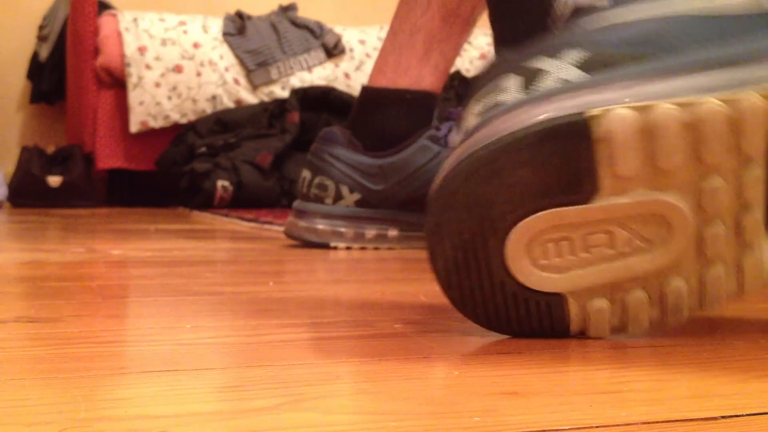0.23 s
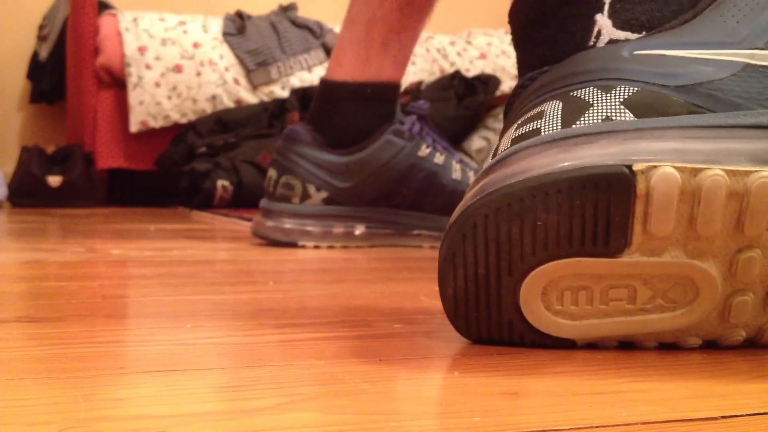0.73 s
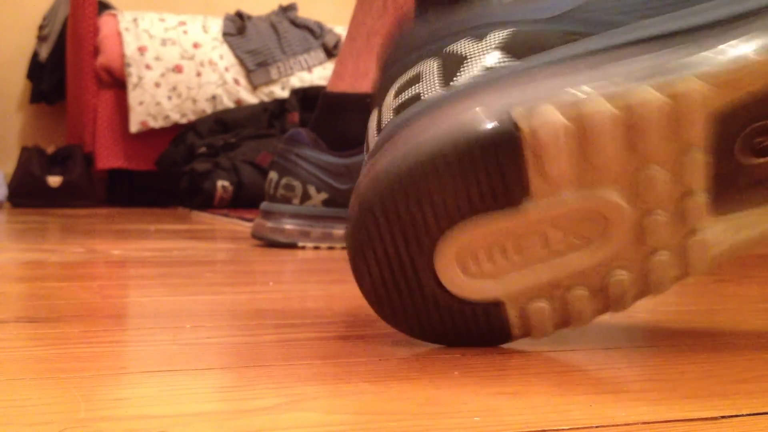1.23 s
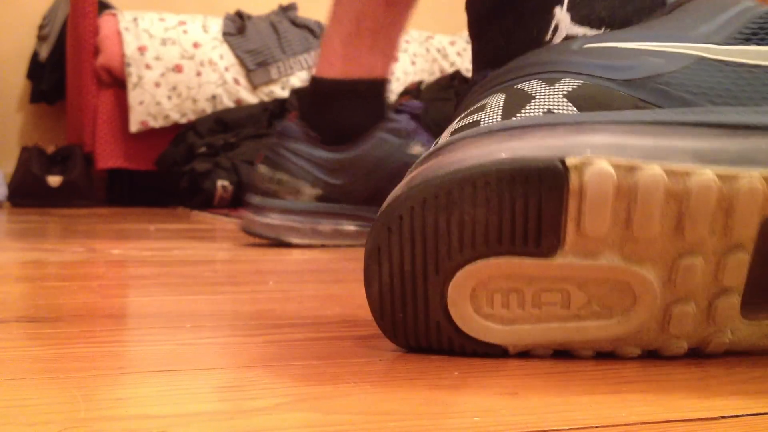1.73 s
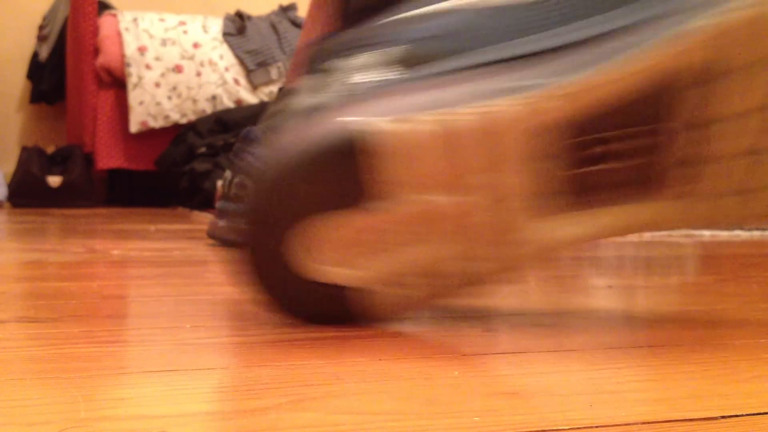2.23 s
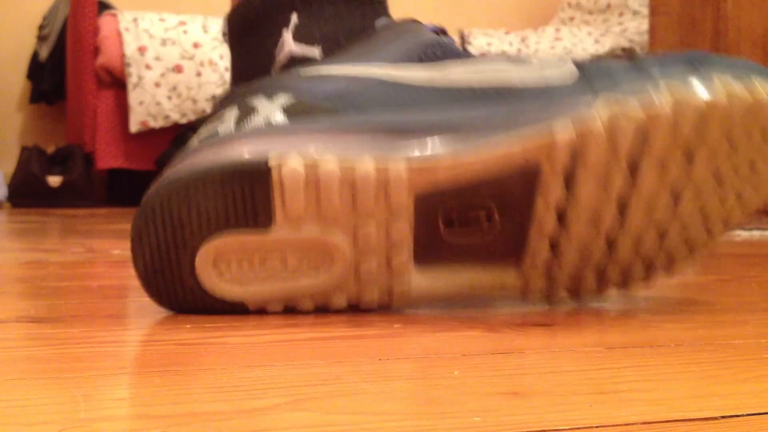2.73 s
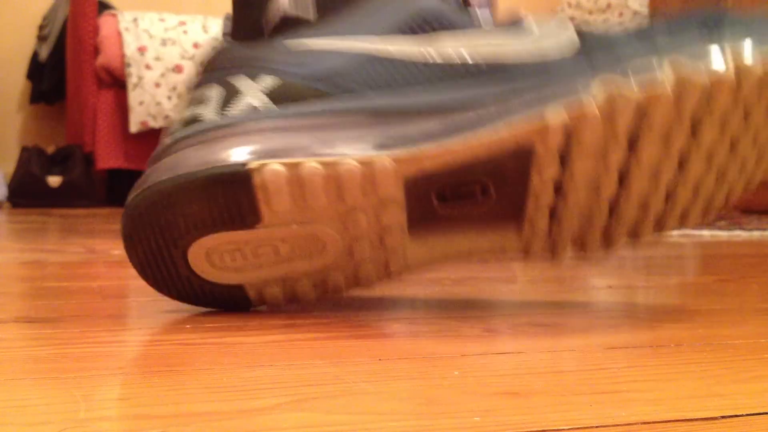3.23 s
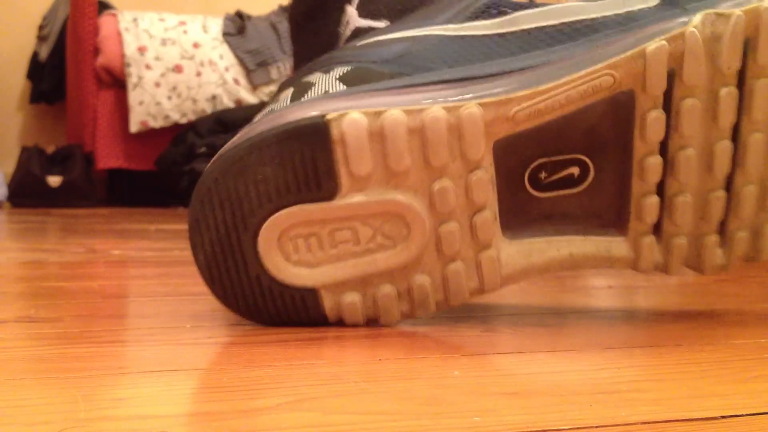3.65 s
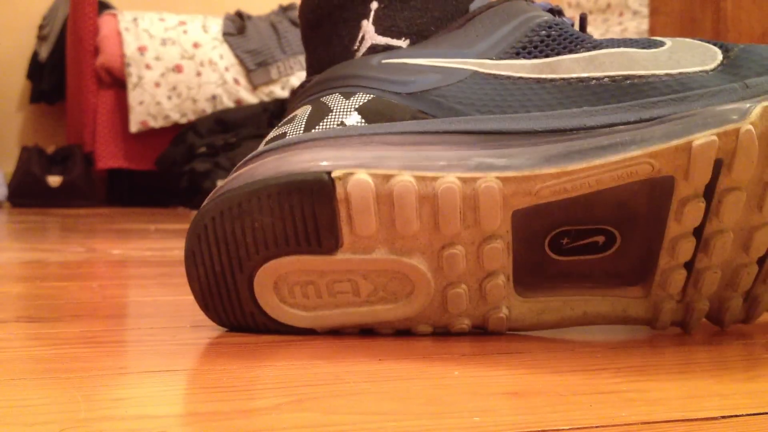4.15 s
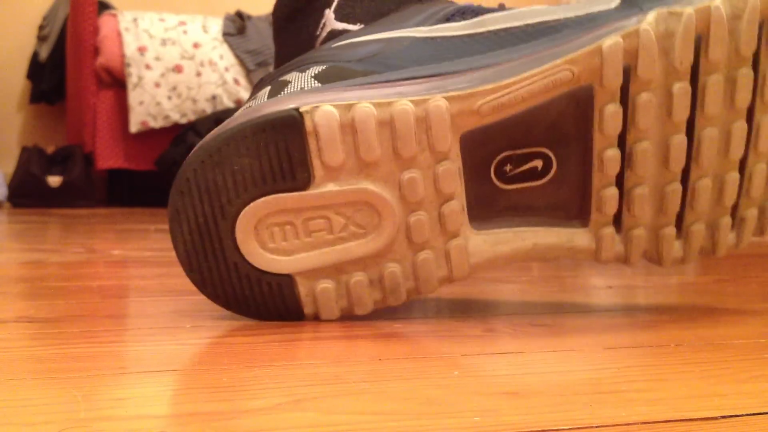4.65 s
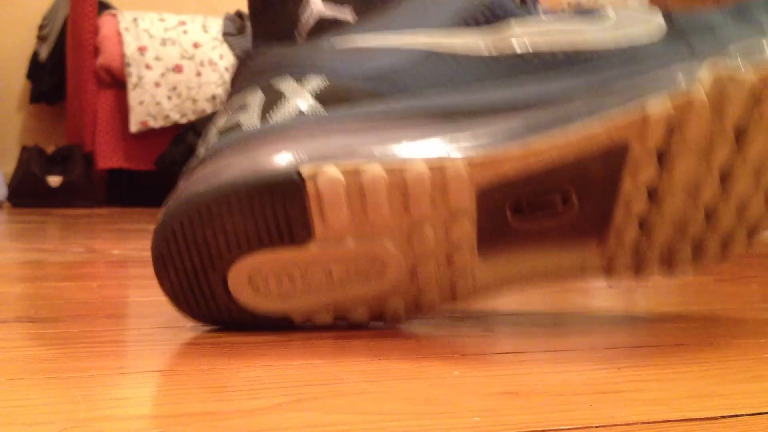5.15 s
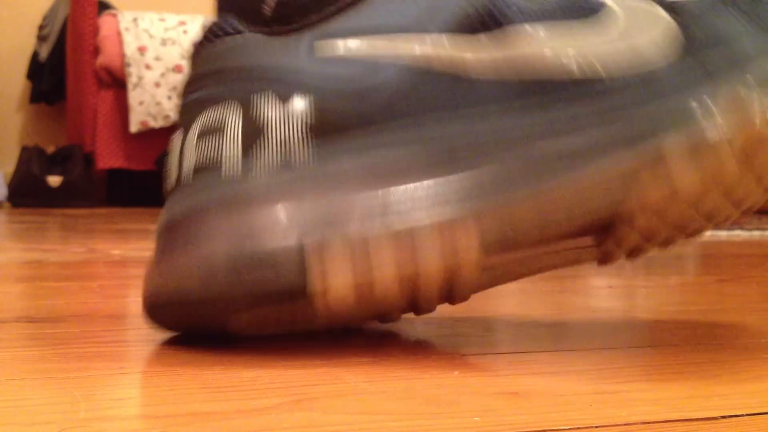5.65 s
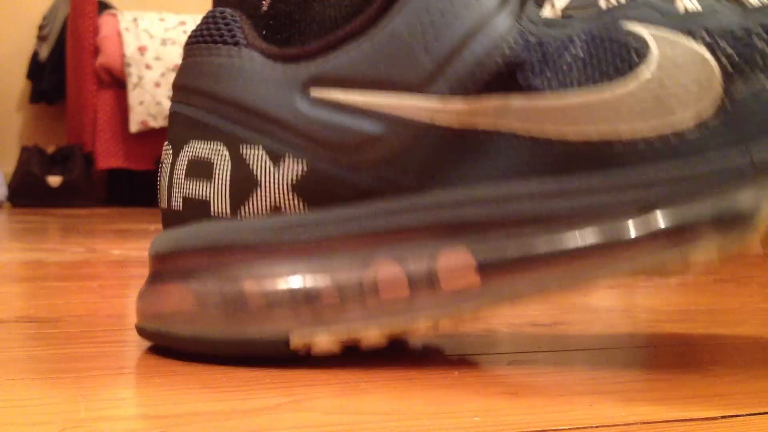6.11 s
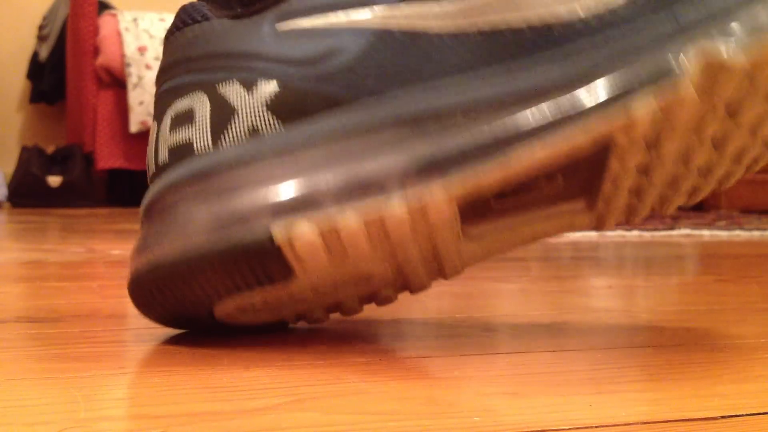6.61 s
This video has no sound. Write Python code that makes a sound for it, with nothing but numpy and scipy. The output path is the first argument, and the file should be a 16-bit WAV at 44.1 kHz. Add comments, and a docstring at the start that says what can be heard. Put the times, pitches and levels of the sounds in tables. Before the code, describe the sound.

A rubber-soled sneaker rolls and scuffs on a hardwood floor, with soft heel thuds, small ticks and sharp snaps.

```python
"""A heel thuds softly on hardwood: a rubber-soled sneaker is stepping and rolling, close by in a small room.
Lugs tick as they peel off the varnish and the hollow cushion knocks. About once a second the tread
grips, sometimes creaks, and lets go with a sharp snap that rings the air in its grooves. Late on, the
sole slaps down once, then drags. Underneath, the shoe brushes over specks of grit and its cushion
flexes with the shifting weight."""
import sys
import numpy as np
from scipy import signal
from scipy.fft import rfft, irfft, next_fast_len
from scipy.io import wavfile

SR = 44100
rng = np.random.default_rng(int(sys.argv[2]) if len(sys.argv) > 2 else 0)


def generate_wav(sig):
    """Save sig (samples, or channels by samples) to the path in sys.argv[1] as 16-bit PCM at SR."""
    pcm = np.round(np.clip(np.atleast_2d(sig).T, -1, 1) * 32767).astype(np.int16)
    wavfile.write(sys.argv[1], SR, pcm)


N = 303048

# EQ curve of each layer: frequency_hz, gain_db
HISS_EQ = [(30, -20), (70, -10), (115, -2), (145, -13), (200, -3.5), (370, -7), (800, -15), (6500, -21.5),
           (15500, -23.5)]
BRUSH_EQ = [(290, -61.5), (500, -6), (680, -2), (1000, -1.5), (2500, -8), (15500, -27.5)]
FLEX_EQ = [(40, -37), (100, -10.5), (210, 3), (400, -3.5), (700, -12.5), (4000, -61)]
SCUFF_EQ = [(75, -40.5), (240, -1.5), (1200, 1), (2800, -3), (4500, -8.5), (7000, -9.5), (10000, -13.5),
            (15000, -23)]
KNOCK_EQ = [(25, -45), (100, 0), (170, -2), (260, -8.5), (500, -22.5), (900, -23), (15000, -72)]
THUD_EQ = [(35, -52), (80, -9), (170, -0.5), (240, -3), (320, -11), (420, -18.5), (700, -22), (1400, -30),
           (1850, -27), (2250, -39), (15000, -73.5)]
TICK_EQ = [(80, -24.5), (350, -9.5), (1600, -8.5), (2500, -3), (3600, -5.5), (4700, -6), (5000, -17.5),
           (6000, -18), (8000, -25), (15000, -43)]
CREAK_EQ = [(120, -35), (450, -29.5), (900, -7.5), (1270, -22.5), (1550, -10.5), (2080, -14.5), (2500, 2.5),
            (2850, -4.5), (3150, 2.5), (3700, -13), (4200, -8), (4900, -22.5), (7000, -20.5),
            (15000, -35.5)]
SLAP_EQ = [(50, -62), (150, -15), (350, -6), (1050, -3.5), (2000, -3), (4500, -17), (6300, -15.5),
           (8000, -29), (15000, -51)]
SNAP_EQ = [(60, -44.5), (200, -23.5), (500, -18.5), (1000, -8), (2400, -4.5), (3200, 4.5), (3500, -5.5),
           (4100, -18), (5000, -29.5), (7000, -31), (10000, -41), (15000, -52)]
FIZZ_EQ = [(3700, -23), (4700, 2.5), (7000, -0.5), (10000, -12.5), (16000, -17.5)]

# reverb send of each layer, relative to its direct sound: frequency_hz, gain_db
KNOCK_SEND = [(130, -5), (250, 0.5)]
THUD_SEND = [(70, -8), (140, -18.5), (200, -0.5), (8000, 1.5)]
TICK_SEND = [(150, 7), (1000, 1.5), (3000, -9.5), (5000, -11), (12000, -4.5)]
CREAK_SEND = [(130, -17.5), (200, 16), (350, -1.5), (900, -7.5), (1600, -1), (2600, -12.5), (3200, -12),
              (5000, -4), (12000, 1.5)]
SLAP_SEND = [(450, 3), (1200, 9), (3000, -0.5), (6000, -9), (12000, 0)]
SNAP_SEND = [(60, -10.5), (140, -5.5), (190, 7.5), (520, 4), (1000, -1.5), (2000, -2.5), (2750, -8.5),
             (3250, -13.5), (3500, -13.5), (4200, -10.5), (5000, -10), (12000, -3)]
# decay of the room: frequency_hz, t60_s
ROOM_DECAY = [(100, 0.43), (1000, 0.43), (3000, 0.43), (8000, .44), (14000, 0.16)]
# early reflections: delay_s, gain
NEAR_ECHOES = [(.0031, 0.13), (.0049, .2)]  # off the shoe and furniture
CEILING_ECHOES = [(0.0167, 0.29)]
# ring of the floorboards: pitch_hz, level_db, t60_s
BOARD_MODES = [(77.5, -47, 0.58), (103, -47.5, 1), (202.4, -40, 0.78), (325.8, -36, 0.27)]

# fader rides for the shoe brushing the floor and the cushion flexing: time_s, level_db
BRUSH_RIDE = [(0, -61), (0.12, -72.5), (0.38, -61), (0.6, -74), (0.86, -59.5), (1.42, -76), (1.52, -67.5),
              (1.9, -71.5), (2.55, -92), (2.73, -67.5), (3.75, -74.5), (3.89, -58.5), (4.0, -72),
              (4.24, -63), (4.72, -73), (5.07, -86), (5.6, -65.5), (5.98, -69), (6.38, -62.5),
              (6.58, -77.5), (6.87, -56.5)]
FLEX_RIDE = [(0, -63), (0.12, -82), (0.38, -66), (0.86, -57.5), (1.44, -75.5), (1.76, -62), (1.92, -73),
             (2.58, -91), (2.72, -63), (3.02, -69.5), (3.45, -76.5), (3.89, -70), (4.25, -57),
             (4.56, -71.5), (5.05, -75.5), (5.6, -68), (6.6, -74.5), (6.85, -55.5)]
# light, bright swishes of the sole skimming the varnish: centre_s, half_length_s, level_db
SWISHES = [(0.537, 0.14, -70.5), (5.01, 0.21, -66), (5.39, 0.064, -67), (6.125, 0.05, -63.5)]
# short, hard drags: start_s, end_s, swell_s, from_db, to_db, tilt_db_per_octave, grit_db
SCUFFS = [(0.896, 0.961, 0.016, -47.5, -52, 0, 7), (2.015, 2.08, .006, -52.5, -56, 5, 4.5),
          (3.115, 3.174, 0.012, -50.5, -55.5, 2.5, 5), (4.026, 4.086, .004, -52, -57.5, 1, 7.5),
          (4.291, 4.353, 0.0081, -57.5, -38, 0, 8), (5.624, 5.719, .02, -62, -53, -1.5, 0.5),
          (5.714, 5.777, 0.0049, -39, -48, -3, 2)]
# the hollow cushion knocking as the sole rolls: time_s, level_db, pitch_hz
KNOCKS = [(1.518, -47.5, 213), (1.545, -43.5, 236), (1.625, -41, 303), (1.657, -48.5, 520),
          (1.714, -47.5, 400), (1.733, -46, 440), (1.752, -48, 425), (1.975, -43, 298),
          (3.860, -47.5, 289.6), (4.045, -43, 420), (4.058, -42, 380), (4.173, -39, 224), (4.182, -44, 209),
          (4.273, -43, 638), (4.281, -41.5, 250), (4.774, -51.5, 256), (4.812, -49, 330),
          (4.836, -46.5, 271), (5.729, -43, 235), (6.062, -56, 330), (6.673, -48, 400), (6.692, -49, 430),
          (6.835, -50, 229)]
# a lug peeling slowly before it ticks free: start_s, end_s, level_db
PEELS = [(0.364, .409, -65), (1.536, 1.565, -61)]
# rubber sticking and slipping under load: start_s, end_s, from_db, to_db, slips_per_s, pitch_hz
CREAKS = [(2.025, 2.081, -43, -42, 150, 2500), (4.310, 4.336, -37, -26, 365, 2600)]

# hits, each with a low shelf (body) and a high shelf (fizz): time_s, level_db, pitch_hz, body_db, fizz_db
# low thuds on the boards: the heel landing, and the sole kicking as the tread snaps free
THUDS = [(.177, -25, 178, 6, -6.5), (.408, -46, 236, -9, -4), (.9417, -32, 288, -17, -33),
         (1.2382, -28, 167, 2, 1), (1.597, -33.5, 271, 7.5, 0), (2.0885, -32, 303, 2, -27),
         (2.309, -40, 170.8, -13, 7), (2.787, -39, 329.6, 4, 2), (3.5522, -26, 164, 1.5, 4),
         (3.925, -39.5, 293, 4.5, -5), (4.159, -36.5, 490, 13.5, -6.5), (4.62, -45.5, 188, 4, 11.5)]
TICKS = [(.356, -40, 3000, 12, -9), (.4091, -29.5, 2903, -1.5, -6.5), (.6503, -21.5, 2420, -0.5, 5),
         (.6867, -29, 2555, -2, 8), (.803, -26.5, 2423, -4, -1.5), (.8213, -29.5, 2500, -2.5, 8),
         (.901, -33, 2617, 3.5, 11), (.915, -26, 2500, 4, 1.5), (.9198, -26, 2726, 2.5, 10.5),
         (1.5322, -39.5, 2890, 8, -4), (1.5659, -26.5, 2845, 0, -6), (1.713, -39, 3000, 2.5, 12.5),
         (1.7298, -46, 2580, 2.5, 8), (1.9835, -33, 2900, 12, -3.5), (2.0192, -36.5, 2580, 2.5, 10.5),
         (2.039, -36, 2600, -1, 18), (2.0462, -37, 2500, 3, 17.5), (2.7511, -38.5, 3700, 0, -8.5),
         (2.7639, -30, 3210, -2.5, -4), (2.9063, -36, 2600, -6, -1), (3.0838, -42.5, 3000, 4, 15),
         (3.1002, -34, 3000, 10.5, 10), (3.1311, -28, 2950, 3, 2), (3.1397, -32, 2950, 0, 5),
         (3.8449, -32.5, 2920, 1, -8.5), (3.9105, -41, 3000, -6.5, 20), (3.9415, -40.5, 3050, -4, 37.5),
         (4.0288, -28, 2510, 8.5, 5.5), (4.0432, -28, 2716, 10.5, 7), (4.0537, -33.5, 2549, 6, 6),
         (4.077, -34.5, 2694, 7.5, 8.5), (4.8394, -29.5, 3350, -1, -2.5), (5.652, -40, 2700, 8, 9)]  # single lugs coming off the varnish
JERKS = [(4.3270, -23.5, 2520, -8.5, -3), (4.3371, -5, 2564, -1, -4.5), (4.3389, -22, 2690, 6.5, 21.5)]  # creaking rubber giving way
SLAPS = [(5.156, -12.5, 3050, -9.5, -2), (5.1575, -23, 3260, -5, -10), (5.1601, -21.5, 3240, 2, -9),
         (5.1626, -21, 3010, 2.5, -12)]  # the sole coming down flat, heel to toe
SNAPS = [(0.9366, -32.5, 3070, -5.5, 12), (0.9384, -32.5, 3150, -5, -0.5), (.9405, -18.5, 3280, -15.5, 15),
         (0.9416, -3.5, 3144, 0.5, 3), (2.0836, -17.5, 3140, -15, 14.5), (2.0857, -10, 3300, -2.5, -7),
         (2.0884, -5, 3210, -2, 4), (3.1745, -1.5, 3660, 3.5, 3), (3.1796, -11, 3520, 1.5, -0.5)]  # the tread letting go

GROOVE_HZ, THUD_HZ, CREAK_HZ = 3200, 172, 2550  # root pitches: a hit here plays its EQ untransposed


def amp(db):
    """Decibels to gain."""
    return 10 ** (np.asarray(db) / 20)


def unit(x):
    """Normalises to rms 1."""
    return x / np.sqrt(np.mean(x ** 2) + 1e-20)


def curve_at(points, hz):
    """Reads a curve along a log-frequency axis."""
    frequency, value = np.transpose(points)
    return np.interp(np.log(hz + 1), np.log(frequency + 1), value)


def add(mix, time_s, sound):
    """Drops a sound into the mix at its cue."""
    part = mix[max(round(time_s * SR), 0):][:len(sound)]
    part += sound[:len(part)]


def equalised(x, eq, tilt_db=0):
    """Applies an EQ curve, tilted by tilt_db an octave; rms 1."""
    size = next_fast_len(len(x))
    hz = np.fft.rfftfreq(size, 1 / SR)
    gain = amp(curve_at(eq, hz) + tilt_db * np.log2(hz + 20))
    return unit(irfft(rfft(x, size) * gain, size)[:len(x)])


def tightest_pulse(shape_db):
    """The quickest transient that has this spectrum (minimum phase)."""
    log_gain = np.log(amp(np.concatenate([shape_db, shape_db[-2:0:-1]])))
    return np.fft.ifft(np.exp(np.conj(signal.hilbert(log_gain)))).real


def hits(rows, eq, root_hz, ripple_db, tracking=1, ring_db=0, ring_width=1):
    """One pulse a hit; a stiffer contact shifts its spectrum up, and it may ring at its pitch."""
    out, hz = np.zeros(N), np.fft.rfftfreq(4096, 1 / SR)
    ripple_hz = np.geomspace(400, 16000, 30)
    for time_s, level_db, pitch_hz, body_db, fizz_db in rows:
        ratio = hz / pitch_hz
        body = 1 / (1 + (ratio / 0.5) ** 4)
        fizz = 1 - 1 / (1 + (hz / max(1.45 * pitch_hz, 1200)) ** 8)
        ring = 1 / (1 + ((ratio - 1) / ring_width) ** 2)
        tone_db = curve_at(eq, hz * (root_hz / pitch_hz) ** tracking)
        shape_db = tone_db + body_db * body + fizz_db * fizz + ring_db * ring
        # every spot of the sole has small resonances of its own
        ripple = np.interp(hz, ripple_hz, np.r_[0, rng.uniform(-1, 1, len(ripple_hz) - 1)])
        pulse = tightest_pulse(shape_db + ripple_db * ripple) / abs(tightest_pulse(shape_db)).max()
        add(out, time_s, -amp(level_db) * pulse)
    return out


def echoed(x, echoes):
    """Adds single early reflections."""
    out = x.copy()
    for delay_s, gain in echoes:
        add(out, delay_s, gain * x)
    return out


def smeared(x, hz=3300, width_hz=1900):
    """An all-pass delay that makes each click or thud swell over a cycle or two."""
    r = np.exp(-np.pi * width_hz / SR)
    poles = np.array([1, -2 * r * np.cos(2 * np.pi * hz / SR), r * r])
    return signal.lfilter(poles[::-1], poles, x)


def reverb(x, send, ring_hz=0, ring_width_hz=170, build_s=0.00084):
    """Diffuse tail of the room; each band dies at its own speed, slowest where the source rings on."""
    reflections = unit(rng.standard_normal(SR) * (rng.random(SR) < 5000 / SR))
    hz, t, bands = signal.stft(reflections, SR, nperseg=512)
    ring = (ring_hz > 0) * np.exp(-.5 * ((hz - ring_hz) / ring_width_hz) ** 2)
    t60 = (curve_at(ROOM_DECAY, hz) * (1 + .13 * ring))[:, None]
    decay = np.exp(-np.log(1000) * t / t60) * np.sqrt(2 * np.log(1000) / (t60 * SR))  # unit energy
    tail = signal.istft(bands * decay * amp(curve_at(send, hz))[:, None], SR, nperseg=512)[1]
    fade_in = 1 - np.exp(-(np.arange(len(tail)) / SR / build_s) ** 2)
    return signal.oaconvolve(x, tail * fade_in)[:N]


def room_tone(level_db=-74.5):
    """The faint, steady hiss of the room."""
    return amp(level_db) * equalised(rng.standard_normal(N), HISS_EQ)


def grains(count, grit_db):
    """Friction noise of countless tiny slips; with more grit a few stand out."""
    return rng.standard_normal(count) * amp(grit_db * np.minimum(rng.exponential(1, count), 4))


def weight_shifts(brush_trim_db=-2, flex_trim_db=-3):
    """The shoe brushes and skims the floor, and its cushion flexes as the weight moves."""
    t = np.arange(N) / SR
    brush_gain = amp(brush_trim_db + np.interp(t, *np.transpose(BRUSH_RIDE)))
    flex_gain = amp(flex_trim_db + np.interp(t, *np.transpose(FLEX_RIDE)))
    swish_gain = sum(amp(db) * np.exp(-.5 * ((t - s) / half_s) ** 2) for s, half_s, db in SWISHES)
    brush = brush_gain * equalised(grains(N, grit_db=4), BRUSH_EQ, tilt_db=0.5)
    flex = flex_gain * equalised(rng.standard_normal(N), FLEX_EQ)
    swish = swish_gain * equalised(grains(N, grit_db=2.5), BRUSH_EQ, tilt_db=3)
    return brush + flex + swish


def grit_specks(per_s=10, lift_db=11.5, lug_hz=3266, detune=.04, body_db=2, fizz_db=2):
    """Hit rows for specks of grit ticking under the sole, louder the harder it brushes."""
    when, loudness, pitch = rng.uniform(-0.89, 1, (256, 3))[:int(per_s * N / SR)].T
    times = (when + 1) / 2 * N / SR
    levels_db = np.interp(times, *np.transpose(BRUSH_RIDE)) + lift_db + loudness
    pitches_hz = lug_hz * (1 + detune * pitch)
    return [(s, db, hz, body_db, fizz_db) for s, db, hz in zip(times, levels_db, pitches_hz)]


def peels(from_hz=4200, to_hz=2850, width_hz=650):
    """Tiny tears under a lifting lug sound the widening gap: a fuzzy whistle that falls."""
    out, r = np.zeros(N), np.exp(-np.pi * width_hz / SR)
    for start, end, level_db in PEELS:
        count = round((end - start) * SR)
        cycles = np.cumsum(np.geomspace(from_hz, to_hz, count)) / SR
        tears = signal.lfilter([1], [1, -2 * r, r * r], grains(SR, grit_db=4.5))[-count:]
        whistle = tears * np.cos(2 * np.pi * cycles) * signal.windows.tukey(count)
        add(out, start, amp(level_db) * unit(whistle))
    return out


def chatter(count, slips_per_s=170, slip_s=0.00098, steady=0.35):
    """Dragged rubber sticks and slips at uneven intervals; each slip flares and fades."""
    gaps, sizes = rng.uniform(.4, 1.6, (2, 128))
    t = np.arange(count) / SR
    starts = (np.cumsum(gaps) - gaps[0]) / slips_per_s
    latest = np.searchsorted(starts, t, "right") - 1
    return unit(steady + sizes[latest] * np.exp(-(t - starts[latest]) / slip_s))


def scuffs(release_s=.006):
    """Gritty rubber dragged over the varnish, swelling as it is pressed down."""
    out = np.zeros(N)
    for start, end, swell_s, from_db, to_db, tilt_db, grit_db in SCUFFS:
        t = np.arange(max(round((end - start) * SR), 64)) / SR
        rub = equalised(grains(SR // 4, grit_db) * chatter(SR // 4), SCUFF_EQ, tilt_db)[:len(t)]
        pressure = amp(np.linspace(from_db, to_db, len(t)))
        fades = np.clip(t / swell_s, 0, 1) * np.clip((t[-1] - t) / release_s, 0, 1)
        add(out, start, rub * pressure * fades)
    return out + reverb(out, send=[(200, -6.5), (1500, -8.5), (10000, -4.5)])


def knocks():
    """The rolling sole sets down one part after another; its hollow cushion rings for a few cycles."""
    rows = [(s, db, hz, 0, 0) for s, db, hz in KNOCKS]
    bumps = hits(rows, KNOCK_EQ, THUD_HZ, ripple_db=11, ring_db=4, ring_width=0.19)
    return bumps + reverb(bumps, KNOCK_SEND)


def floor_thuds(boards_db=-26.5):
    """A landing heel or the sole's kick at a snap pushes the floor: the boards ring, the room answers."""
    push = hits(THUDS, THUD_EQ, THUD_HZ, ripple_db=5)
    t = np.arange(SR // 2) / SR
    modes = sum(amp(db) * np.exp(-np.log(1000) * t / t60) * np.cos(2 * np.pi * hz * t)
                for hz, db, t60 in BOARD_MODES)
    boards = amp(boards_db) * signal.oaconvolve(push, modes)[:N]
    thud = echoed(smeared(push, hz=100, width_hz=73), CEILING_ECHOES)
    return thud + boards + reverb(push, THUD_SEND)


def creaks(jitter=0.14, body_db=-9, fizz_db=-8):
    """Uneven runs of slips that grow until the rubber jerks free."""
    slips = []
    for start, end, from_db, to_db, slips_per_s, pitch_hz in CREAKS:
        times = np.arange(start, end, 1 / slips_per_s)
        times += rng.standard_normal(64)[:len(times)] * jitter / slips_per_s
        levels_db = np.linspace(from_db, to_db, len(times))
        slips += [(s, db, pitch_hz, body_db, fizz_db) for s, db in zip(times, levels_db)]
    return hits(JERKS + slips, CREAK_EQ, CREAK_HZ, ripple_db=3)


def torn(x, split_hz=4800, spread_s=0.0011):
    """Rubber lets go in many tiny tears, so the top end of a click becomes a short fizz."""
    treble = signal.sosfiltfilt(signal.butter(8, split_hz, "highpass", fs=SR, output="sos"), x)
    r = np.exp(-1 / (spread_s * SR))
    envelope = np.sqrt(signal.lfilter([1 - r], [1, -r], treble ** 2 + 1e-20))
    return x - treble + envelope * equalised(rng.standard_normal(N), FIZZ_EQ)


def hit_tails(rows, eq, send, ripple_db):
    """Each hit leaves from another spot of the sole, so it raises its own pattern of reflections."""
    out = np.zeros(N)
    for time_s, level_db, pitch_hz, body_db, fizz_db in rows:
        pulse = hits([(0, level_db, pitch_hz, body_db, fizz_db)], eq, GROOVE_HZ, ripple_db)[:SR // 8]
        tuned_send = [(hz * pitch_hz / GROOVE_HZ, db) for hz, db in send]
        add(out, time_s, reverb(pulse, tuned_send, ring_hz=pitch_hz))
    return out


def tread():
    """Snaps, ticks, peels, creaks and the slap: each rings the air in the tread grooves, then the room."""
    snaps = hits(SNAPS, SNAP_EQ, GROOVE_HZ, ripple_db=6)
    ticks = hits(TICKS + grit_specks(), TICK_EQ, GROOVE_HZ,
                 ripple_db=2, tracking=0, ring_db=6.5, ring_width=0.092)
    slap = hits(SLAPS, SLAP_EQ, GROOVE_HZ, ripple_db=3)
    creak, whistles = creaks(), peels()
    wet = hit_tails(SNAPS, SNAP_EQ, SNAP_SEND, ripple_db=2.5)
    wet += hit_tails(SLAPS, SLAP_EQ, SLAP_SEND, ripple_db=-1)
    wet += reverb(ticks + whistles, TICK_SEND) + reverb(creak, CREAK_SEND)
    direct = torn(smeared(snaps + ticks + creak)) + slap + whistles
    return echoed(direct, NEAR_ECHOES) + wet


def scene():
    """The mono mix: the shoe's layers over the room tone."""
    return (room_tone() + tread() + floor_thuds() + knocks() + scuffs() + weight_shifts())[None]


def record(dry, low_cut_hz=62, high_cut_hz=15700):
    """The microphone's bass roll-off, then a steep cut of the very top."""
    thinned = signal.sosfilt(signal.butter(2, low_cut_hz, "highpass", fs=SR, output="sos"), dry)
    high_cut = signal.firwin(301, high_cut_hz, window=("kaiser", 9), fs=SR)
    return signal.oaconvolve(thinned, high_cut[None], "same")


dry = scene()
out = record(dry)
generate_wav(out)
```